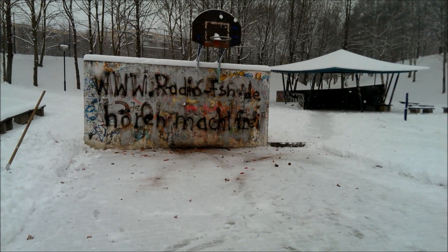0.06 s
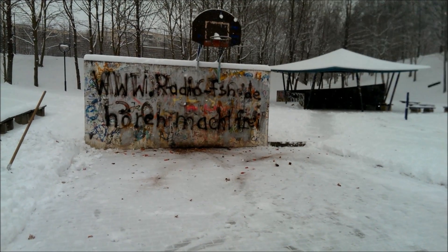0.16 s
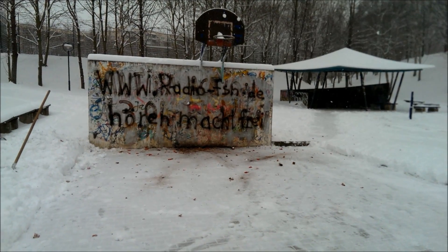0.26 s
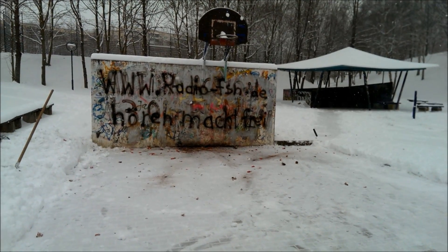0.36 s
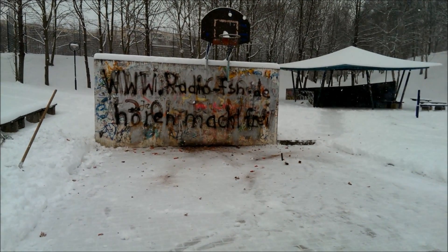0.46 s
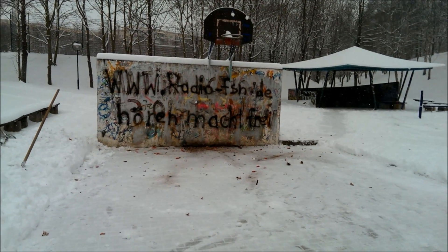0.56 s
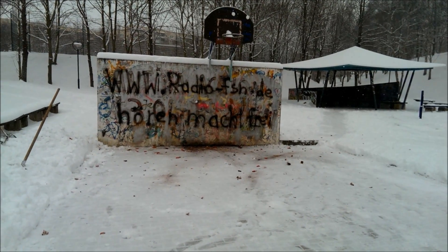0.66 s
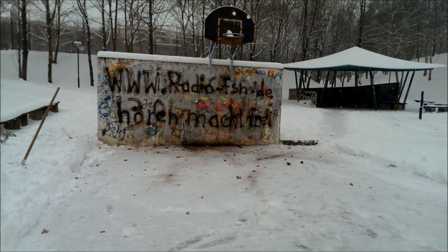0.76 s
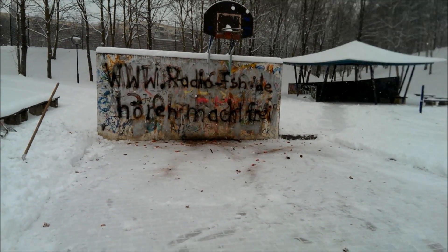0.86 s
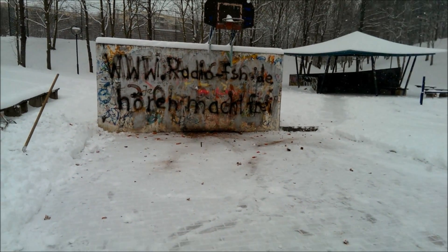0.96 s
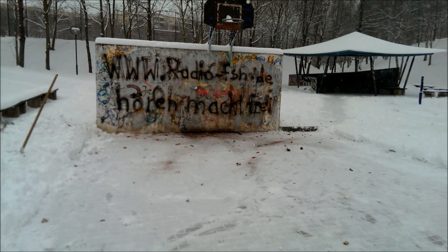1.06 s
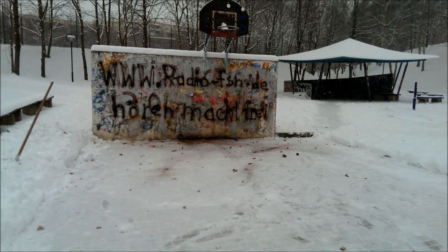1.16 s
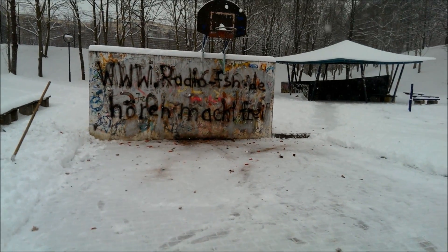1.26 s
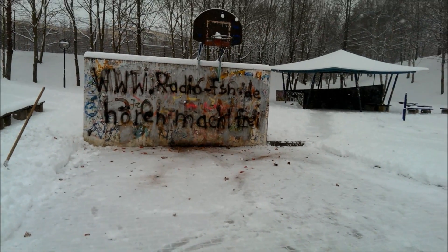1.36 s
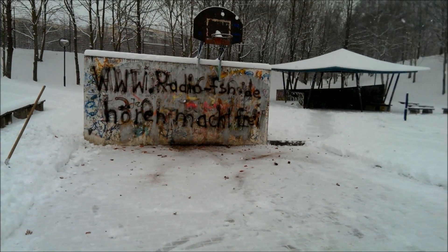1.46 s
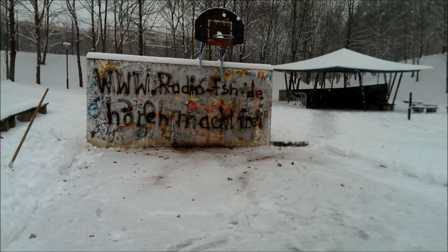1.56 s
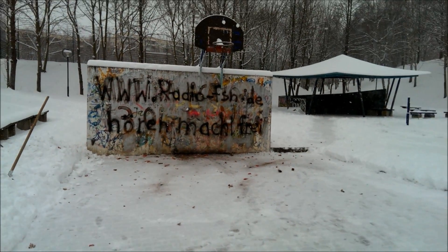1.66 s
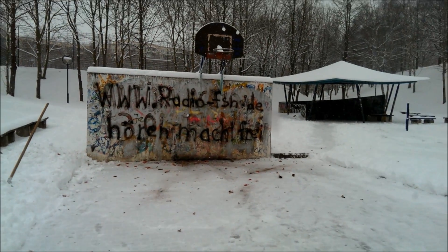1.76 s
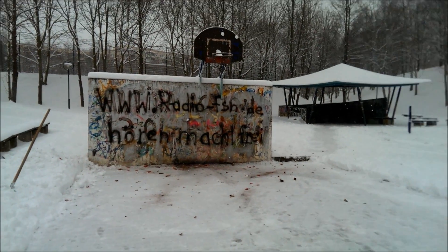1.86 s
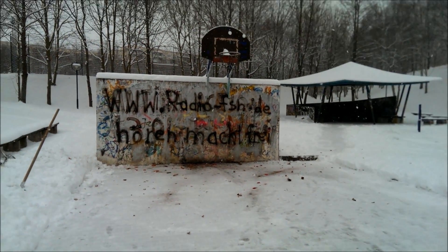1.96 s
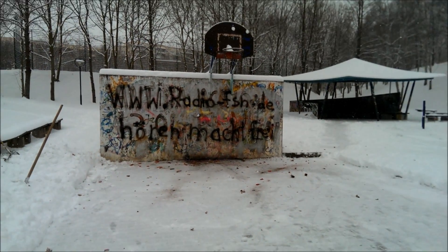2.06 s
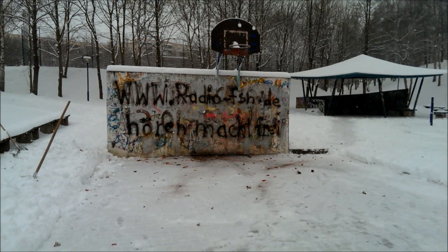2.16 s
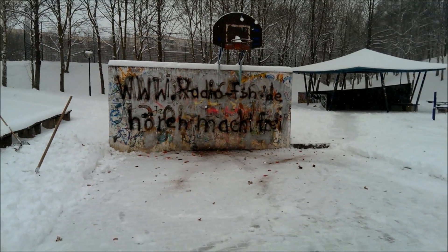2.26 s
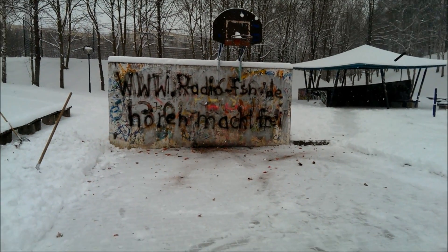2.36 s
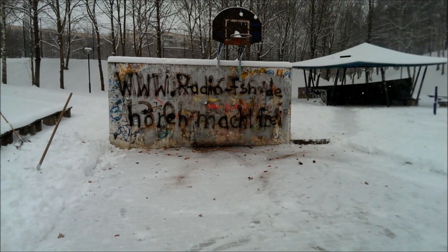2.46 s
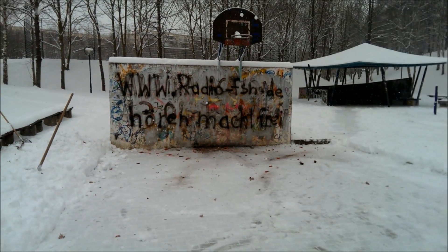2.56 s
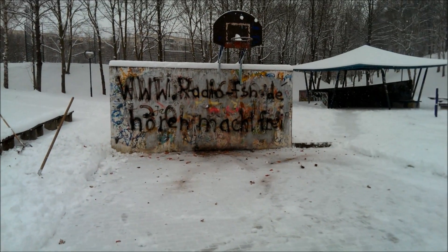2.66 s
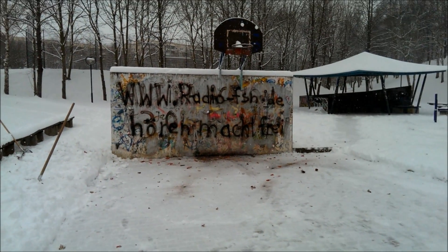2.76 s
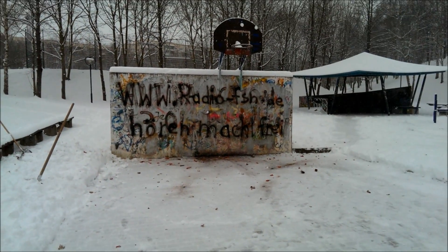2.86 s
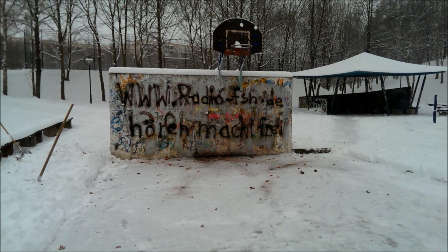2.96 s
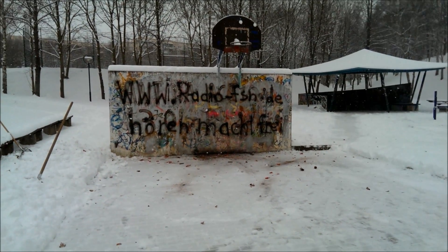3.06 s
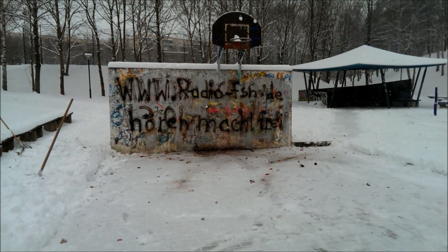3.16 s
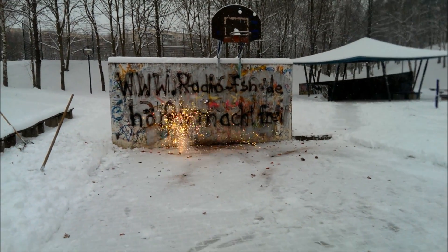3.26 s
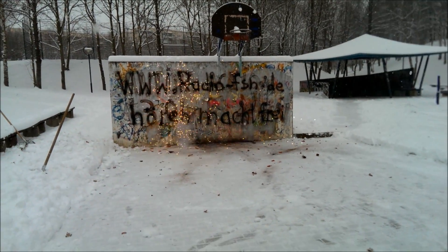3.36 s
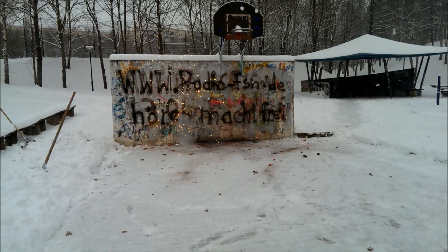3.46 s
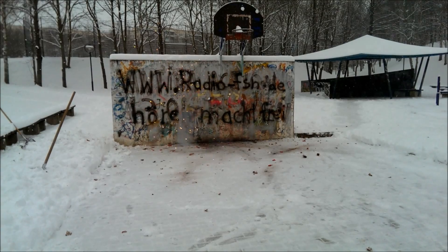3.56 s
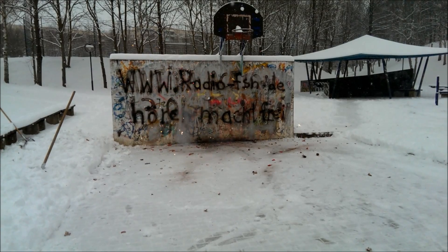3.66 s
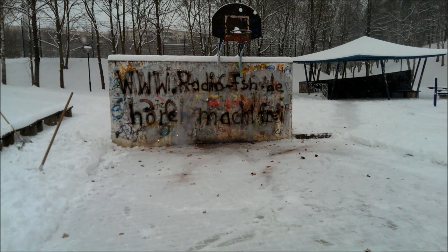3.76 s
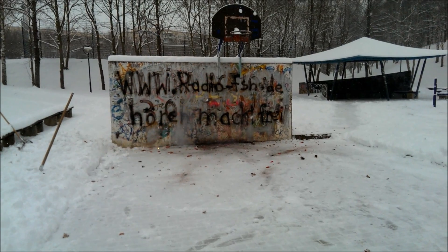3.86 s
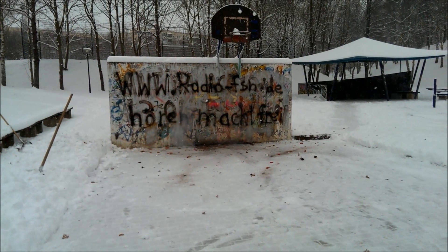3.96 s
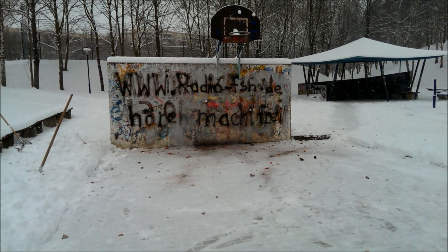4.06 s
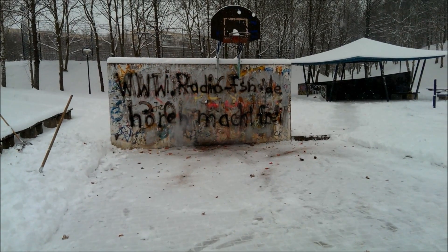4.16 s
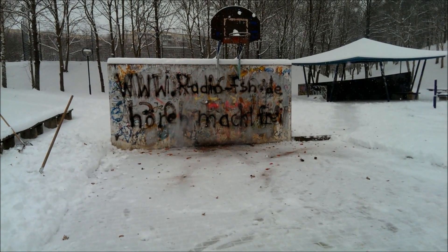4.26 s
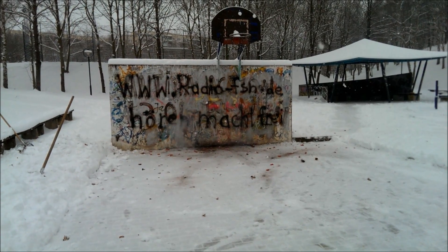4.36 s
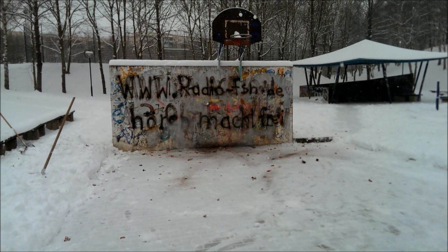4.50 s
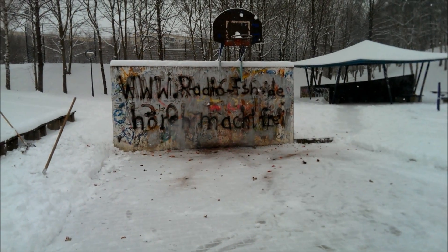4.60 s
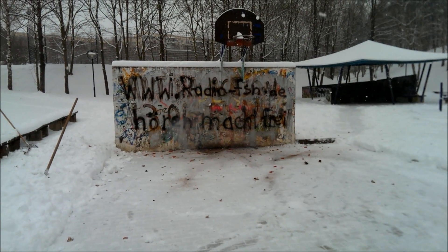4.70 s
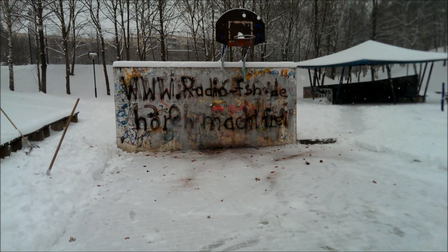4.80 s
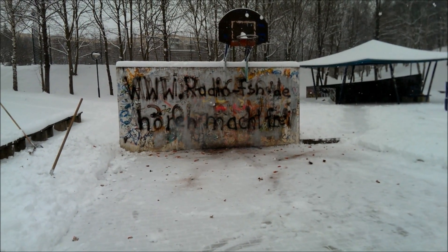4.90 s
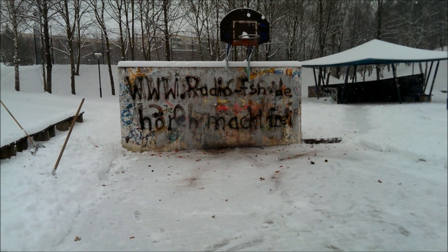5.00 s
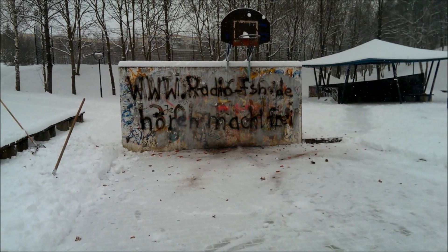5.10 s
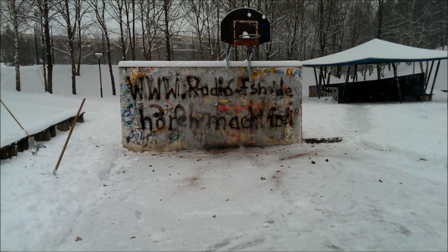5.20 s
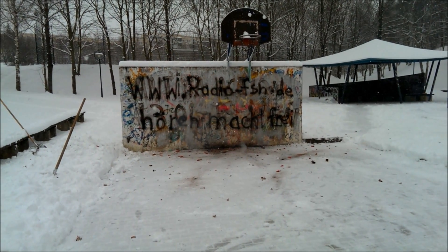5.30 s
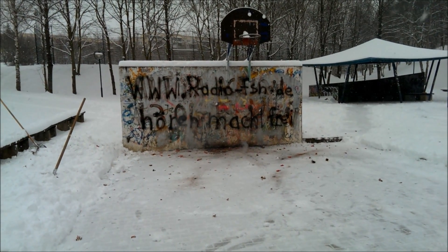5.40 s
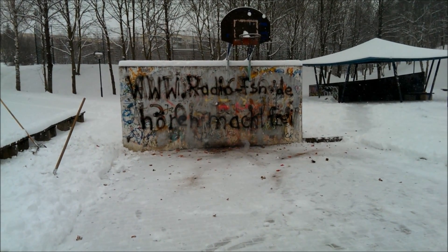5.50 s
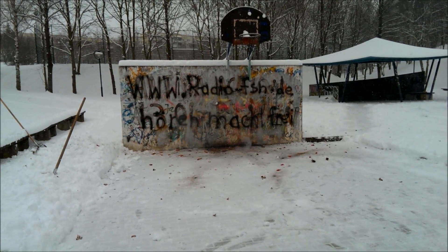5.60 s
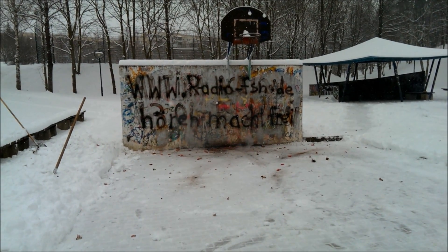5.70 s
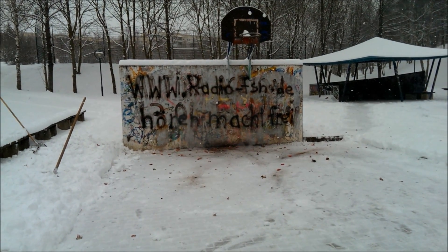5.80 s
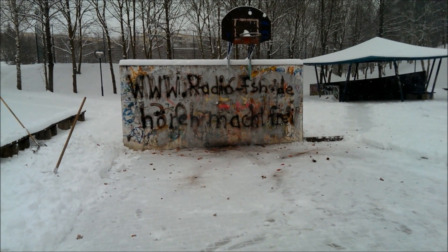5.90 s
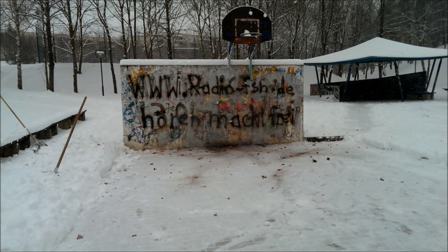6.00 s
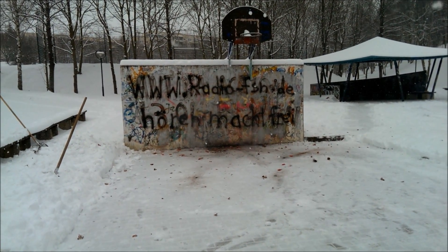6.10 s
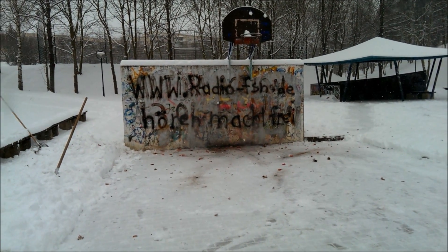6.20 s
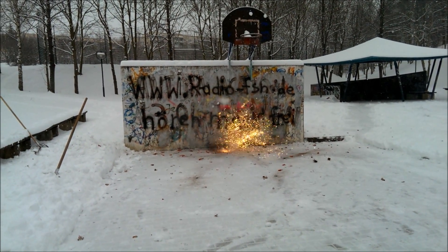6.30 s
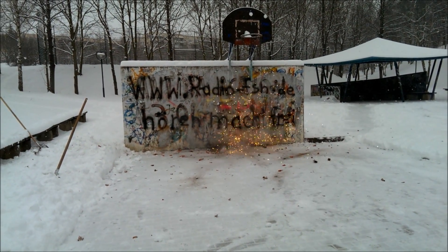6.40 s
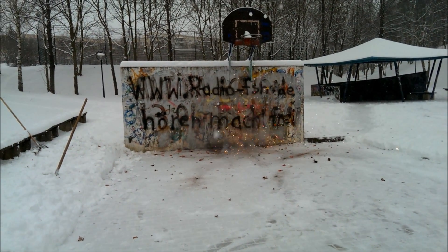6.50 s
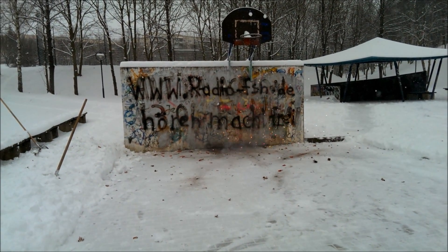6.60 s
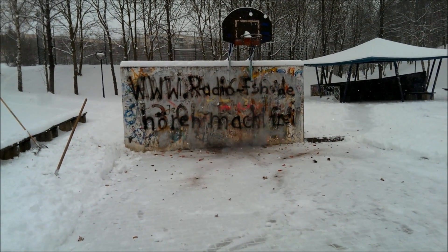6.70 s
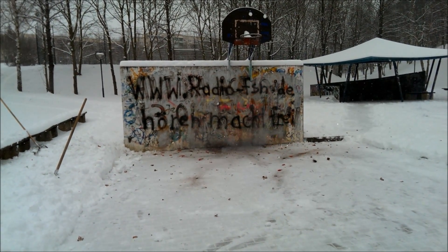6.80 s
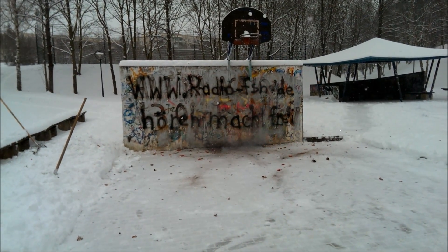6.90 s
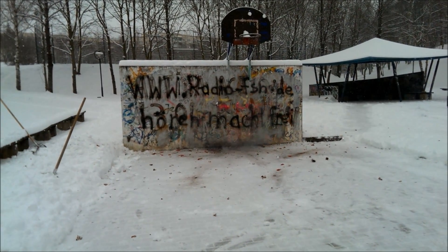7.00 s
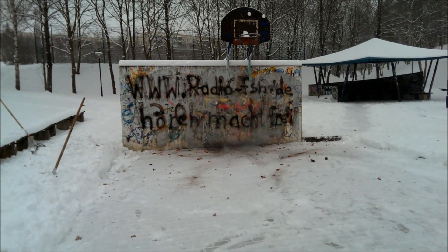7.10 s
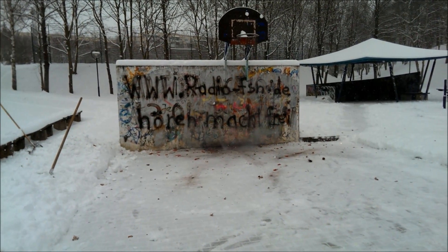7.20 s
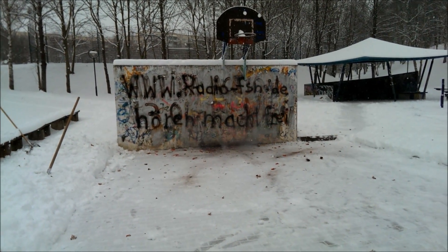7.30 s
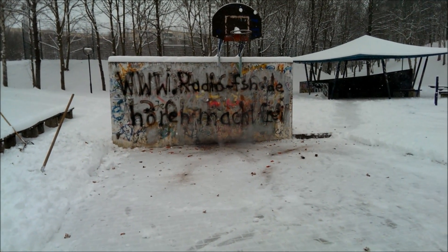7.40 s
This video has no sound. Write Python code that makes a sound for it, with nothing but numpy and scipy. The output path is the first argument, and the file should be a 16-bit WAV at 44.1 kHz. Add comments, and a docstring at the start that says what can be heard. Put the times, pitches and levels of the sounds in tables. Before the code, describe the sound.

Two firecrackers go off in a snowy open area, each a sharp crack with quick echoes and a woody rolling tail, amid faint wind and cloth rustle.

```python
"""Snowy court ringed by trees: steady air noise, light wind bumping the microphone ports, a jacket rustling near.
Handling clicks, then a firecracker lands with a tick (snow crunch plus tube modes); its fuse hisses as a noise jet.
A second one lands just before the first bursts: shock volley with boom and thump, slaps off the buildings,
scattered noise from the wood, grit pattering down. The second fuse then hisses, flares and ends in a like burst.
"""
import sys
import numpy as np
from scipy import signal
from scipy.fft import rfft, irfft, next_fast_len
from scipy.io import wavfile
from scipy.ndimage import uniform_filter1d

SR = 44100
rng = np.random.default_rng(int(sys.argv[2]) if len(sys.argv) > 2 else 0)


def digitize_waveform(pressure):
    """Quantize a signal to 16-bit integers and store it at the path in sys.argv[1].

    Rows of a 2-D input are taken as channels; values are limited to [-1, 1].
    """
    field = np.atleast_2d(pressure).T
    bounded = np.clip(field, -1, 1)
    quanta = np.round(bounded * 32767).astype(np.int16)
    wavfile.write(sys.argv[1], SR, quanta)


N = 328545
TIME_S = np.arange(N) / SR

# Noise spectra, relative. Each row: frequency in Hz, density in dB per Hz.
AIR_COLOUR = [(15, -24), (25, -3.5), (145, -10.5), (344, -5), (591, -13.5), (1040, -8.5), (1190, -12),
              (3430, -16), (7510, -23), (14400, -23.5), (16000, -32)]
WIND_COLOUR = [(12, -26), (20, -4.5), (54, 4.5), (76, 2), (138, -10), (268, -19.5), (357, -15.5),
               (400, -36), (520, -57), (880, -120)]
SLIDE_COLOUR = [(350, -5), (600, -1.5), (1110, -1), (1250, -1), (1660, 3), (2390, 1), (3980, -4),
                (4880, -4), (6700, -26), (9000, -26), (11700, -32), (19800, -120)]
SWISH_COLOUR = [(350, -43), (600, -26.5), (1030, -12.5), (1260, -16.5), (1530, -5.5), (3580, -12.5),
                (4110, -9), (6920, -13.5), (13600, -19), (16000, -25)]
CLICK_COLOUR = [(300, -19), (1000, -22), (1650, -4), (2500, -24), (3250, 6.5), (4000, -13), (5200, 2),
                (6300, -1.5), (7400, -4), (9700, -2), (12300, -14), (13700, -3), (15500, -11)]
CRUNCH_COLOUR = [(500, -30), (900, -1), (1600, 4.5), (2800, 8.5), (4300, -4), (9000, -10), (16000, -12)]
FUSE_COLOUR = [(240, -47), (400, -7), (570, -9), (687, -1), (826, -3), (1040, -0.5), (1160, -1.5),
               (1680, 3), (1840, 2), (4880, 0.5), (16000, -56)]
BLAST_COLOUR = [(18, -24), (30, -38), (157, -11), (252, -7), (461, -4.5), (584, -5), (684, -2), (913, -1.5),
                (1590, -5), (2060, -7.5), (2290, -7), (5450, -9), (6380, -13.5), (14000, -15.5),
                (16000, -18)]
NEAR_WOOD_COLOUR = [(35, -54), (60, -10), (118, -17), (233, -16.5), (354, -5.5), (636, -4.5), (842, -2.5),
                    (1860, -4), (2140, -5), (3670, -7), (11800, -19.5), (14600, -20.5), (16000, -33)]
FAR_WOOD_COLOUR = [(88, -48), (150, -26), (211, -15.5), (340, -1), (492, -2), (1020, 2.5), (1720, -9.5),
                   (2950, -15.5), (4140, -42), (6000, -45), (7800, -72), (13200, -120)]
GRIT_COLOUR = [(300, -5), (900, 4), (2500, 7.5), (5000, 2), (9000, -7), (16000, -9)]

# Likeness of left and right. Each row: frequency in Hz, correlation.
EAR_CORRELATION = [(100, 0.68), (400, 0.84), (1000, 0.15), (3000, 0.41), (12000, 0.042)]
# Left port against right. Each row: frequency in Hz, difference in dB.
PORT_BALANCE = [(100, -5), (450, -3.5), (1000, -1), (2200, 1), (4500, 0), (8000, -0.5), (13000, -7)]

# Gusts on the ports. Each row: centre in seconds, level in dB before the wind gain, width in seconds.
GUSTS = [(.02, -66, 0.045), (.25, -67.5, 0.14), (.67, -62.5, 0.078), (1.2, -63, 0.039), (1.47, -60, 0.044),
         (1.7, -61.5, 0.17), (2.18, -55, 0.18), (2.75, -69, 0.037), (3.9, -53, .11), (4.22, -57, 0.09),
         (6.24, -60, 0.072), (6.58, -48, 0.056), (6.97, -53, 0.042)]
# Cloth sliding on cloth. Each row: start in seconds, length in seconds, level in dB before the body gain,
# weave pitch at full speed in Hz, weave in dB added to the level.
SLIDES = [(-.1, 0.27, -54, 3200, 0.5), (0.151, 0.31, -54, 4100, -4), (0.493, 0.17, -54.5, 4500, -5.5),
          (0.749, 0.3, -53, 4800, -5), (1.07, 0.13, -52.5, 4900, -5.5), (1.202, 0.24, -56, 4360, -3)]
# Brisk sleeve strokes. Each row: start in seconds, length in seconds, level in dB before the sleeve gain,
# weave pitch at full speed in Hz, weave in dB added to the level.
SWISHES = [(-.13, 0.5, -57, 3200, -4), (0.28, 0.63, -66.5, 3300, -14), (0.7, 0.6, -59.5, 3300, -14),
           (1.15, 0.87, -71, 3300, -13), (1.616, 0.66, -63.5, 3380, -18), (2.06, 0.14, -60.5, 4200, -7),
           (2.163, 0.19, -54.5, 3030, 0.5), (2.234, 0.26, -54, 3700, -7), (2.42, 0.42, -63.5, 3300, -13),
           (2.716, 0.21, -64.5, 3300, -8), (2.855, 1, -67.5, 3300, 1.5), (4.446, 0.42, -74, 3340, -5)]
# Single wind bumps. Each row: centre in seconds, level in dB before the bump gain, width in seconds, pitch in Hz.
BUMPS = [(.179, -49.5, 0.0092, 120), (.24, -55, .016, 90), (.32, -57, 0.006, 108), (.52, -49.5, 0.012, 120),
         (.867, -49, 0.013, 139), (1.436, -42.5, 0.011, 90), (1.73, -48, 0.007, 90),
         (1.81, -49.5, 0.0065, 110), (2.011, -47.5, 0.013, 100), (2.079, -47, 0.0088, 111),
         (2.14, -50.5, .006, 130), (2.284, -51.5, 0.0077, 120), (4.545, -56.5, 0.013, 100),
         (5.361, -53.5, 0.015, 102), (6.279, -50, 0.0048, 90), (6.291, -42, 0.0054, 130),
         (6.343, -49, 0.017, 100), (6.378, -39, 0.007, 110), (6.391, -37.5, 0.0077, 90),
         (6.915, -48.5, 0.0093, 90)]
# Handling clicks near the microphone. Each row: start in seconds, level in dB, low-pass in Hz.
CLICKS = [(0.6785, -24, 16000), (0.683, -28.5, 9000), (1.14, -37, 3500), (1.161, -42, 2500)]
# Cardboard tubes landing and bouncing. Each row: start in seconds, level in dB, hardness as low-pass in Hz,
# pitch as a factor on the tube modes, snow crunch in dB against the ring.
LANDINGS = [(0.7103, -23.5, 6000, 1.0, -16.5), (0.7258, -40, 9000, 1.0, -14),
            (0.7303, -35.5, 6000, 1.0, -10), (3.214, -27, 4200, 0.92, 0), (3.2225, -30.5, 7000, 0.95, -6)]
# Tube modes. Each row: frequency in Hz at pitch 1, mean level in dB, t60 in seconds.
TUBE_MODES = [(880, -23, 0.0045), (1680, -25, 0.004), (2330, -7, 0.0065), (3200, -8.5, 0.013),
              (3440, -6.5, 0.017), (4230, -12, .005), (6460, -16, 0.0068), (10000, -16, 0.0089),
              (13800, -19, 0.0054)]
# Burning fuses, one per burst. Each row: catching time in seconds, time to full flame in seconds,
# level in dB before the sag, share of a close reflection.
FUSES = [(1.38, 0.2, -54, 0.033), (4.47, 0.25, -61.5, 1)]
# Flares of the flame. Each row: centre in seconds, level in dB, width in seconds.
FLARES = [(4.975, -62.5, 0.061), (5.35, -69, .2), (5.77, -67, 0.014)]
# Bursts. Each row: start in seconds, level in dB, length in seconds, fall in seconds, low-pass in Hz,
# wall slap share, thump in dB, thump width in seconds, boom in Hz, boom in dB, level sent to the wood in dB.
BURSTS = [(3.3601, -14.5, 0.0043, 0.0058, 8800, 0.56, -11, .0016, 486, -0.5, -18),
          (6.3958, -14.5, 0.0092, 0.0068, 8550, 0.27, -13, 0.00072, 680, -6.5, -17)]
# Returns from buildings and banks. Each row: arrival in seconds, level in dB, smear in seconds, low-pass in Hz,
# thump in dB, boom in Hz, boom in dB, left against right in dB.
ECHOES = [(3.4085, -28, .001, 1800, -12, 900, -7, -3), (3.4135, -20.5, 0.0032, 2600, -10, 1350, 0, -1),
          (3.418, -18, 0.0037, 5000, -5.5, 1350, -10, 0.5), (3.4237, -18, 0.0024, 3200, -4, 480, 1, -1),
          (3.4382, -25, 0.0022, 7000, -16, 3900, 9, -6), (3.4447, -27, .002, 1400, -16, 850, 6, 0),
          (3.468, -31.5, 0.012, 3200, -15, 900, -8, -2.5), (3.504, -27, 0.018, 2600, -16, 1150, -1, -0.5),
          (3.543, -31.5, 0.02, 2000, -27, 1100, 2, 1), (3.629, -42, 0.025, 1300, -16, 450, 0.5, 0),
          (3.80, -51.5, 0.059, 900, -20, 400, -3, -3), (3.958, -50, .008, 800, -13, 380, 4, 0),
          (4.05, -51, 0.067, 3200, -23, 950, 4, 2), (4.14, -58, .055, 2500, -30, 1100, 6, 2),
          (4.269, -56, 0.0097, 440, -19, 420, 5, 0), (4.365, -63, 0.028, 500, -22, 380, 5, 0),
          (6.4435, -27, .002, 1500, -8, 800, -3, -3), (6.4515, -22.5, 0.0032, 2500, -11, 900, -2, -1),
          (6.4553, -17, 0.0041, 3800, -10, 700, -1, -1), (6.4645, -29, .002, 1800, -8, 1200, 0, 3),
          (6.482, -29, 0.0058, 1800, -23, 900, 5, 0), (6.5036, -26.5, 0.0027, 3000, -16, 850, 1, -3),
          (6.536, -25.5, .019, 3600, -20, 1620, -8, -1), (6.582, -31.5, 0.02, 2300, -20, 1200, -11, 0),
          (6.635, -39, 0.069, 1600, -26, 700, 0, -1), (6.76, -46, 0.083, 3000, -31, 2500, 1, -2),
          (6.865, -47, 0.041, 900, -24, 400, 2, 0), (7.03, -48, .045, 2200, -38, 950, 7, -2),
          (7.10, -54, 0.077, 2000, -32, 1000, 4, -1), (7.305, -48, 0.0064, 450, -24, 400, 5, 0)]
# Dying of the near wood. Each row: frequency in Hz, t60 in seconds.
NEAR_WOOD_T60 = [(100, 1.3), (400, 1.23), (1000, 1.45), (2500, 1.475), (5000, 0.83), (9000, 0.75),
                 (15000, 0.79)]
# Falling grit. Each row: start in seconds, level in dB before the grit gain, shower decay in seconds.
GRIT = [(3.7562, -47.5, 0.0075), (3.768, -56, .006), (3.78, -47, 0.016), (3.8144, -52, 0.0092),
        (3.8432, -55, .0085), (3.925, -53, 0.011), (6.7165, -41.5, .004), (6.723, -43, .007),
        (6.738, -47, .004), (6.819, -48.5, 0.0018), (6.826, -51, .002), (6.8385, -54, .002),
        (6.845, -53, .003), (6.853, -53, .003), (6.8763, -49.5, .0025), (6.9, -48, .001),
        (6.9018, -39, .006), (6.9315, -53, .005)]

AIR_DB = -68
BREEZE_DB, BREEZE_SWING_DB = -76, 5.5  # between gusts, before the wind gain
SLIDE_SKEW, SWISH_SKEW = 0.57, 0.61  # below 1 a stroke speeds up faster than it slows down
WEAVE_REST_HZ = 3100  # weave pitch at a crawl
FUSE_SAG_DB_PER_S = 2.5  # the jet weakens as it burns into the tube
BURST_RISE_S = 0.0024
ECHO_RISE_S, ECHO_FALL_S = 0.0015, 0.003
ECHO_SLAP = 0.18  # wall slap added to each echo
ECHO_LOW_CUT_HZ = 142  # walls of this size send back little deep bass
AIR_LOSS_HZ_S = 2480  # over the delay, this is the echo's extra low-pass
COURT_DB, TREES_DB, ROLL_DB = -6.5, -10.5, -29  # scatter against the level sent
ROLL_DELAY_S, ROLL_RISE_S, ROLL_HOLD_S, ROLL_FALL_DB_PER_S = 0.18, 0.037, 0.28, 23.5
CUTOFF_HZ = 16000


def from_db(db):
    """Decibels to gain."""
    return 10 ** (np.asarray(db) / 20)


def rms_one(x):
    """Scale to rms 1."""
    return x / np.sqrt(np.mean(x ** 2) + 1e-20)


def at_hz(points, hz):
    """Read a table on a log-frequency axis."""
    points = np.array(points)
    return np.interp(np.log(np.maximum(hz, 1)), np.log(points[:, 0]), points[:, 1])


def pan(db):
    """Left and right gains for a level difference."""
    return from_db(np.array([[db], [-db]]) / 2)


def dull(x, hz):
    """One-pole low-pass."""
    return signal.sosfilt(signal.butter(1, min(hz, 0.45 * SR), fs=SR, output="sos"), x)


def bandpass(x, low_hz, high_hz, order=2):
    """Butterworth band-pass."""
    return signal.sosfilt(signal.butter(order, [low_hz, high_hz], "band", fs=SR, output="sos"), x)


def low_cut(x, hz):
    """Third-order high-pass."""
    return signal.sosfilt(signal.butter(3, hz, "high", fs=SR, output="sos"), x)


def late(x, delay_s):
    """Delay along the last axis by a fractional number of samples."""
    size = next_fast_len(x.shape[-1] + 1024, True)
    shift = np.exp(-2j * np.pi * delay_s * np.fft.rfftfreq(size, 1 / SR))
    return irfft(rfft(x, size) * shift, size)[..., :x.shape[-1]]


def from_right(x, lag_s):
    """Delay the left port, as for sound from the right; a negative lag places it left."""
    return np.array([late(x[0], lag_s), x[1]])


def add(out, start_s, sound):
    """Mix in a short sound."""
    i = int(start_s * SR)
    out[:, i:i + sound.shape[-1]] += sound[..., :N - i]


def ears(pair, correlation):
    """Turn two unrelated signals into left and right with a given correlation."""
    correlation = np.clip(correlation, -1, 1)
    return np.sqrt(1 + correlation) * pair[0] + np.sqrt(1 - correlation) * pair[1] * [[1], [-1]]


def noise(colour):
    """Stereo noise of a given colour, falling steeply beyond its ends; rms 1."""
    size = next_fast_len(N, True)
    hz = np.fft.rfftfreq(size, 1 / SR) + 1
    top_edge = 1 / (1 + (hz / colour[-1][0] / 1.2) ** 6)
    low_edge = 1 / (1 + (colour[0][0] / 1.2 / hz) ** 4)
    white = ears(rfft(rng.standard_normal((2, size))), at_hz(EAR_CORRELATION, hz))
    return rms_one(irfft(white * top_edge * low_edge * from_db(at_hz(colour, hz)), size)[:, :N])


def drift(rate_hz):
    """Random curve: straight lines between normal knots of spread 1."""
    knots = rng.standard_normal(4000)
    return np.interp(TIME_S * rate_hz, np.arange(len(knots)), knots)


def coloured(x, colour, size=8192):
    """Causal (minimum-phase) filter of a given colour, for short sounds."""
    cepstrum = irfft(np.log(from_db(at_hz(colour, np.fft.rfftfreq(size, 1 / SR)))))
    cepstrum[1:size // 2] *= 2
    cepstrum[size // 2 + 1:] = 0
    return irfft(rfft(x, size) * np.exp(rfft(cepstrum)))


def puffs(rows):
    """Sum of bell-shaped gain curves."""
    return sum(from_db(db) * np.exp(-((TIME_S - centre_s) / width_s) ** 2) for centre_s, db, width_s in rows)


def air():
    """Steady broadband air noise."""
    return from_db(AIR_DB) * noise(AIR_COLOUR)


def wind(gain_db=-2, pan_db=-8, eddy_db=3.0):
    """Lumpy low rumble on the ports: a faint breeze and gusts that break into eddies."""
    breeze = from_db(BREEZE_DB + BREEZE_SWING_DB * drift(5))
    gusts = puffs(GUSTS) * from_db(eddy_db * drift(35))
    return pan(pan_db) * from_db(gain_db) * (breeze + gusts) * noise(WIND_COLOUR)


def stroke(start_s, length_s, skew):
    """Relative speed of one arm movement, from rest up to 1 and back."""
    progress = np.clip((TIME_S - start_s) / length_s, 0, 1)
    return np.abs(np.sin(np.pi * progress ** skew))


def weave(pitch_hz, width_octaves):
    """Threads rasp over threads: a narrow hiss around a moving pitch."""
    white = rng.standard_normal((2, 2, N))
    edges_hz, out = np.geomspace(2400, 5800, num=9), 0
    for k, (low, high) in enumerate(zip(edges_hz, edges_hz[1:])):
        band = bandpass(white[k % 2], low, high)  # adjacent bands are unrelated
        octaves_off = np.log2(pitch_hz / np.sqrt(low * high))
        out = out + band * np.exp(-(octaves_off / width_octaves) ** 2)
    return rms_one(out)


def jacket(body_db=-4.0, sleeve_db=5, grain_db=1.43, lag_s=0.000318, slide_power=0.65, swish_power=1.36):
    """Cloth rubs in strokes; the speed of each sets its loudness and the pitch of the weave."""
    sliding, rasping, slide_hz = 0, 0, WEAVE_REST_HZ
    for start_s, length_s, db, top_hz, weave_db in SLIDES:
        speed = stroke(start_s, length_s, SLIDE_SKEW)
        sliding = sliding + from_db(db) * speed ** slide_power
        rasping = rasping + from_db(db + weave_db) * speed ** slide_power
        slide_hz = np.maximum(slide_hz, WEAVE_REST_HZ + (top_hz - WEAVE_REST_HZ) * np.sqrt(speed))

    brisk, zipping, swish_hz = 0, 0, WEAVE_REST_HZ
    for start_s, length_s, db, top_hz, weave_db in SWISHES:
        speed = stroke(start_s, length_s, SWISH_SKEW)
        brisk = brisk + from_db(db) * speed ** swish_power
        zipping = zipping + from_db(db + weave_db) * speed ** swish_power
        swish_hz = swish_hz + (top_hz - WEAVE_REST_HZ) * speed

    # the body gain acts on the plain rub only, the sleeve gain on rub and weave
    body = sliding * from_db(body_db) * noise(SLIDE_COLOUR) + rasping * weave(slide_hz, width_octaves=0.41)
    sleeve = brisk * noise(SWISH_COLOUR) + zipping * weave(swish_hz, width_octaves=0.38)
    cloth = body + from_db(sleeve_db) * sleeve
    return from_right(cloth * from_db(grain_db * drift(200)), lag_s)


def bumps(gain_db=-1, pan_db=-7, correlation=0.42, size=8192):
    """Short lumpy thuds of air on the ports: band noise at a pitch of its own under a bell."""
    out, t = np.zeros((2, N)), (np.arange(size) - size / 2) / SR
    for centre_s, db, width_s, hz in BUMPS:
        bell = np.exp(-(t / width_s) ** 2)
        eddy = bandpass(ears(rng.standard_normal((2, size)), correlation), hz / 2, hz * 1.415, order=4)
        thud = rms_one(pan(pan_db) * eddy * bell) * np.sqrt(np.mean(bell ** 2))
        add(out, centre_s + t[0], from_db(db + gain_db) * thud)
    return out


def clicks(fall_s=0.0017, pan_db=-3, lag_s=0.00036, size=8192):
    """Tiny bright handling snaps close by: decaying coloured noise."""
    out, t = np.zeros((2, N)), np.arange(size) / SR
    for start_s, db, dull_hz in CLICKS:
        snap = coloured(ears(rng.standard_normal((2, size)), 0.48) * np.exp(-t / fall_s), CLICK_COLOUR)
        add(out, start_s, from_db(db) * pan(pan_db) * from_right(dull(snap, dull_hz), lag_s))
    return out


def landings(lowest_hz=680, crunch_s=0.0014, size=4096):
    """Each contact crunches snow and rings the tube for milliseconds; it is too small to radiate bass."""
    out, t = np.zeros((2, N)), np.arange(size) / SR
    for start_s, db, hard_hz, pitch, crunch_db in LANDINGS:
        ring = 0
        for hz, mode_db, t60_s in TUBE_MODES:
            level_db = mode_db + rng.normal(0, 1, (2, 1)) - 60 * t / t60_s
            ring = ring + from_db(level_db) * np.sin(2 * np.pi * hz * pitch * t)
        crunch = ears(rng.standard_normal((2, size)), 0.26) * np.exp(-t / crunch_s)
        crunch = coloured(crunch, CRUNCH_COLOUR, size=size)
        add(out, start_s, from_db(db) * dull(ring + from_db(crunch_db) * crunch, hard_hz))
    return low_cut(out + 1e-18, lowest_hz)


def fuses(echo_s=0.00293, sputter_db=1.5, out_s=0.1):
    """The burning jet builds up, flares and fades from the burst on; a close reflection makes it hollow."""
    jet = noise(FUSE_COLOUR) * from_db(sputter_db * drift(40))
    out = jet * puffs(FLARES)
    for (lit_s, rise_s, db, echo_share), burst in zip(FUSES, BURSTS):
        age_s = np.maximum(TIME_S - lit_s, 0)
        flame = np.minimum(age_s / rise_s, 1) * np.exp(-np.maximum(TIME_S - burst[0], 0) / out_s)
        hiss = rms_one(jet + echo_share * late(jet, echo_s))
        out += flame * from_db(db - FUSE_SAG_DB_PER_S * age_s) * hiss
    return out


def blast(length_s, dull_hz, slap, thump_db, boom_hz, boom_db, rise_s, fall_s, slap_s=0.00583,
          body_lag_s=0.00191, body_hz=1500, thump_s=0.00083, boom_q=1.76, size=8192):
    """Volley of shock fronts with boom and thump, doubled by the wall just behind; crack leads body."""
    t, hz = np.arange(size) / SR, np.fft.rfftfreq(size, 1 / SR)
    fronts = rng.standard_normal((2, size)) * rng.exponential(1, size)
    envelope = np.minimum(t / rise_s, 1) * np.exp(-np.maximum(t - length_s, 0) / fall_s)
    spectrum = rfft(np.tanh(fronts / 2) * envelope)
    # every band carries its share of the energy
    spectrum = spectrum / np.sqrt(uniform_filter1d(np.abs(spectrum) ** 2, size=55))
    spectrum = ears(spectrum, at_hz(EAR_CORRELATION, hz))
    # the lows trail the highs
    spectrum = spectrum * np.exp(-2j * np.pi * body_lag_s * body_hz * np.arctan(hz / body_hz))
    wave = dull(coloured(irfft(spectrum), BLAST_COLOUR), dull_hz) * (t < t[-1] / 2)
    boom = signal.lfilter(*signal.iirpeak(boom_hz, boom_q, fs=SR), wave)
    wave = wave + from_db(boom_db) * boom
    # the thump is one push and one suck of air
    phase = (t - length_s / 2 - 2 * thump_s) / thump_s
    thump = rms_one(-phase * np.exp(-phase ** 2 / 2))
    wave = rms_one(wave) + from_db(thump_db) * thump
    wall_slap = dull(late(wave, slap_s), dull_hz / 2)
    return (wave + slap * wall_slap) * np.sqrt(length_s / t[-1])


def bangs(lead_s=0.00004, echo_lead_s=0.00007):
    """Bursts a little left of centre, then slaps from the surroundings, duller the longer they travel."""
    out = np.zeros((2, N))
    for start_s, db, length_s, fall_s, dull_hz, slap, thump_db, thump_s, boom_hz, boom_db, _ in BURSTS:
        burst = blast(length_s, dull_hz, slap, thump_db, boom_hz, boom_db, BURST_RISE_S, fall_s, thump_s=thump_s)
        add(out, start_s, from_db(db) * from_right(burst, -lead_s))
    for start_s, db, smear_s, dull_hz, thump_db, boom_hz, boom_db, pan_db in ECHOES:
        delay_s = min(start_s - burst[0] for burst in BURSTS if burst[0] < start_s)
        echo = blast(smear_s, dull_hz, ECHO_SLAP, thump_db, boom_hz, boom_db, ECHO_RISE_S, ECHO_FALL_S)
        echo = low_cut(dull(echo, AIR_LOSS_HZ_S / delay_s), ECHO_LOW_CUT_HZ)
        add(out, start_s, pan(pan_db) * from_db(db) * from_right(echo, -echo_lead_s))
    return out


def roll(burst_s):
    """Gain of the far wood's answer to a burst: it swells, holds and dies evenly."""
    age_s = np.maximum(TIME_S - burst_s - ROLL_DELAY_S, 0)
    level_db = ROLL_DB - ROLL_FALL_DB_PER_S * np.maximum(age_s - ROLL_HOLD_S, 0)
    return (1 - np.exp(-age_s / ROLL_RISE_S)) * from_db(level_db)


def woods(trip_s=0.059, rise_s=0.036, patchy_db=1.3, trunk_db=1.5, clump_db=1.5, court_s=0.028,
          court_hz=3000, lag_s=0.000378, wall_share=0.22, wall_s=0.00583):
    """Trunks scatter the bang: near ones first and brightly, after a short gap; far ones later and dully."""
    near, far, out = noise(NEAR_WOOD_COLOUR), noise(FAR_WOOD_COLOUR), np.zeros((2, N))
    sent = [(burst[0], from_db(burst[-1])) for burst in BURSTS]
    ages_s = [np.maximum(TIME_S - burst_s - trip_s, 0) for burst_s, _ in sent]
    swells = [gain * from_db(TREES_DB) * (1 - np.exp(-age_s / rise_s)) for (_, gain), age_s in zip(sent, ages_s)]
    edges_hz = np.geomspace(45, 18000, num=10)
    for low, high in zip(edges_hz, edges_hz[1:]):
        band = bandpass(near, low, high)
        t60_s = at_hz(NEAR_WOOD_T60, np.sqrt(low * high))
        dying = sum(swell * np.exp(-np.log(1000) * age_s / t60_s) for swell, age_s in zip(swells, ages_s))
        out += band * (dying * from_db(patchy_db * drift(60)))
        near = np.roll(near, SR, axis=1)  # neighbouring bands are unrelated
    # before the trees answer, only the court itself scatters
    for burst_s, gain in sent:
        court = (TIME_S > burst_s) * np.exp(-np.abs(TIME_S - burst_s) / court_s)
        out += dull(near, court_hz) * gain * from_db(COURT_DB) * court
    out += far * from_db(clump_db * drift(35)) * sum(gain * roll(burst_s) for burst_s, gain in sent)
    # the wall doubles whatever goes out to the trees, which makes the roll hollow
    out = (out + wall_share * dull(late(out, wall_s), 2500)) / np.hypot(1, wall_share)
    return from_right(out * from_db(trunk_db * drift(300)), lag_s)


def grit(gain_db=-12, size=8192):
    """Crumbs of ice and cardboard land singly or in showers: decaying bursts of uneven noise."""
    out, t = np.zeros((2, N)), np.arange(size) / SR
    for start_s, db, decay_s in GRIT:
        crumbs = rng.standard_normal((2, size)) * rng.exponential(1, size) * np.exp(-t / decay_s)
        add(out, start_s, from_db(db + gain_db) * rms_one(coloured(crumbs, GRIT_COLOUR)))
    return out


def scene():
    """Everything on the court."""
    ambience = air() + wind() + bumps()
    handling = jacket() + clicks()
    return ambience + handling + landings() + fuses() + bangs() + woods() + grit()


def record(dry, top=0.46):
    """The two ports differ in colour, peaks are rounded, the top is cut."""
    size = next_fast_len(N + 4096, True)
    balance = from_db(at_hz(PORT_BALANCE, np.fft.rfftfreq(size, 1 / SR)) * [[0.5], [-0.5]])
    heard = irfft(rfft(dry, size) * balance, size)[:, :N]
    rounded = top * np.tanh(heard / top)
    return signal.sosfilt(signal.ellip(10, 0.1, 80, CUTOFF_HZ, fs=SR, output="sos"), rounded)


dry = scene()
out = record(dry)
digitize_waveform(out)
```